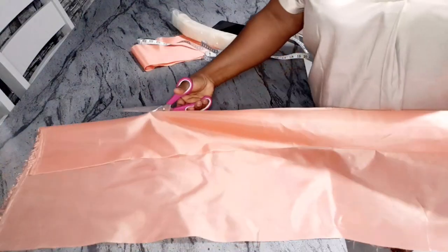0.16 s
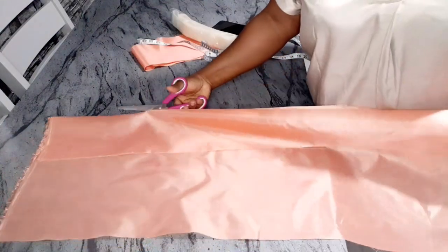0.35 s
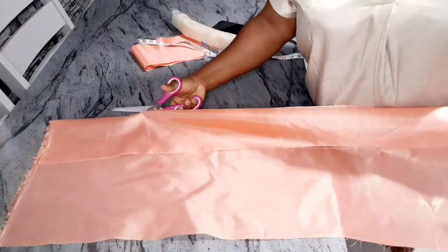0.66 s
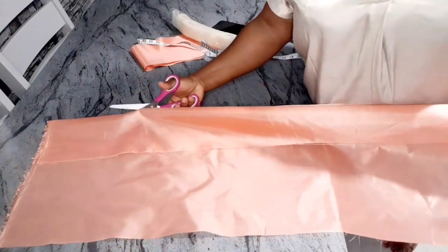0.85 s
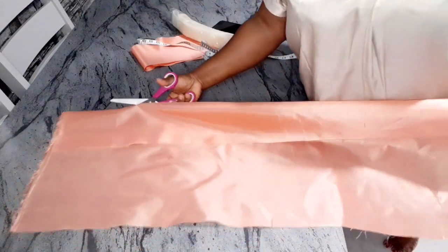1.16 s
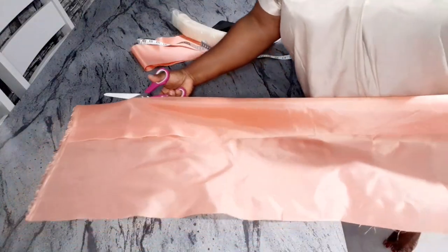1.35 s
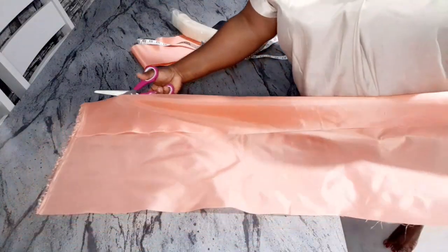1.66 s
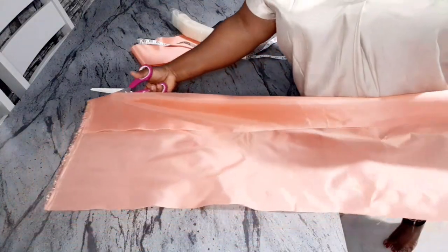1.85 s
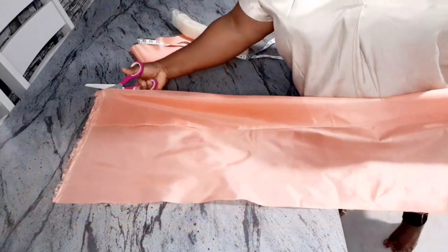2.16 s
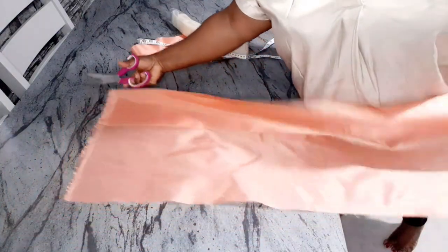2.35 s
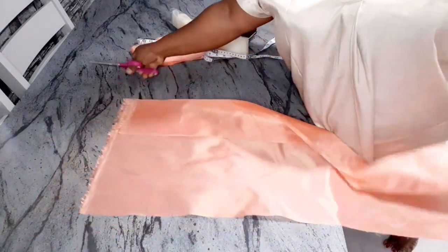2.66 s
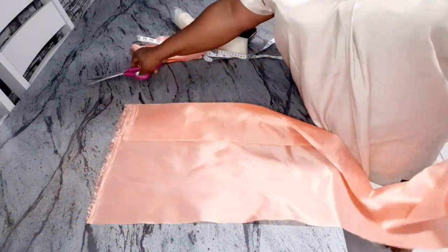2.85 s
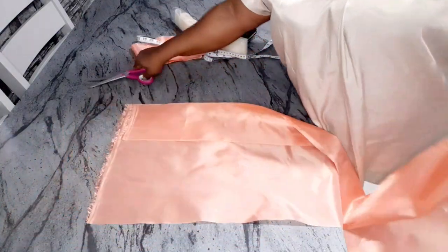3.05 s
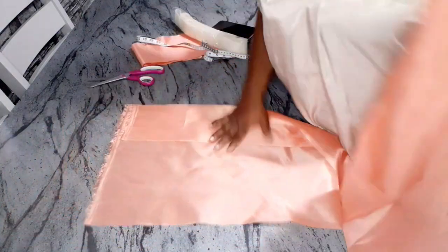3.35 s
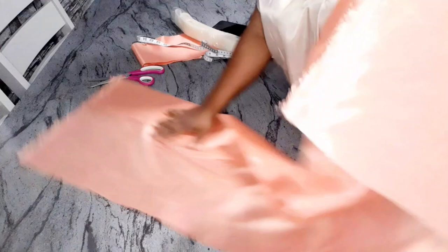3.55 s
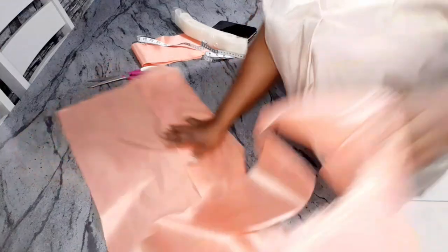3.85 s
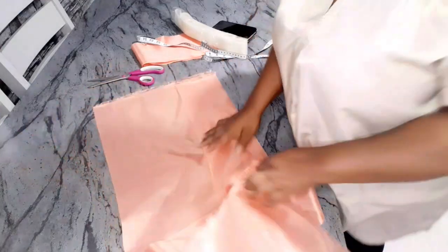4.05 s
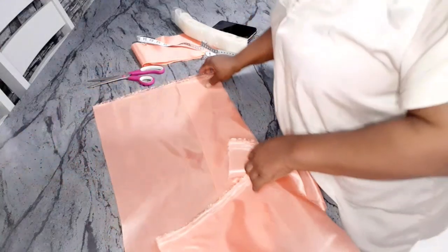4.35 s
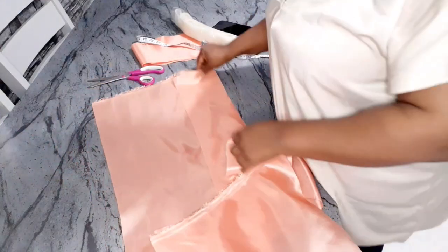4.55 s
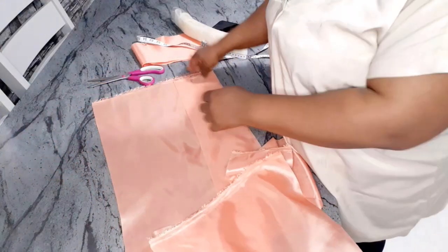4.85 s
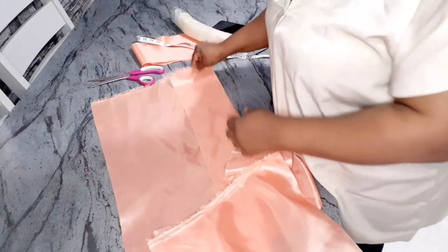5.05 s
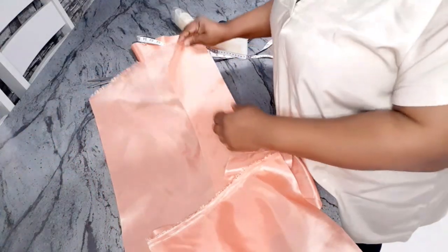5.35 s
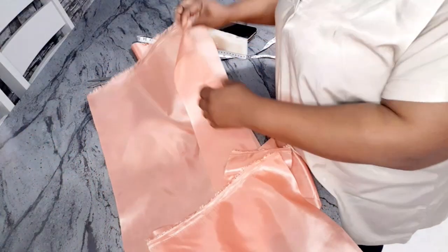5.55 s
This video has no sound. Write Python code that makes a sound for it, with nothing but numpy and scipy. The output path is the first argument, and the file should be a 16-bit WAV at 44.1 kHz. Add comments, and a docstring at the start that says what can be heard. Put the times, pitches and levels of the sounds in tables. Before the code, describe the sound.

Scissors snip and glide crisply through stiff satin on a table, knock down with a clatter, then the cloth is swept across with a hissing rustle.

```python
"""In a small hard room with a faint hum, scissors snip into stiff satin: threads snap, edges click.
They glide through the rest, lower blade droning on the table, snip once more, bump the table and drop.
The cloth is swept round, folded and patted down: hissing fibres, a buzzing weave and hollow thuds.
Cutting and cloth are shaped noise, blows are bursts that ring damped modes, and two closely spaced
microphones hear it all with the room's answer."""
import sys
import numpy as np
from scipy import signal
from scipy.fft import rfft, irfft, next_fast_len
from scipy.io import wavfile
from scipy.ndimage import map_coordinates

SR = 44100
rng = np.random.default_rng(int(sys.argv[2]) if len(sys.argv) > 2 else 0)


def waveform_to_disk(signal):
    """Save audio, clipped to [-1, 1], as 16-bit WAV at the path in sys.argv[1]."""
    frames = np.transpose(np.atleast_2d(signal))
    scaled = np.clip(frames, -1, 1) * 32767
    samples = np.round(scaled).astype(np.int16)
    wavfile.write(sys.argv[1], SR, samples)


N = 250929
TIME = np.arange(N) / SR

# All table levels are relative: later gains set how loud each layer is heard.
# the blades close on the cloth: [t/s, length/s, hardest at share of the stroke/0-1, first click level/dB,
# thread snapping level/dB, blade scraping level/dB, table rumble level/dB]
SNIP_STROKES = [(0.0, 0.071, 0.33, -16, -27, -27, -37), (0.2175, 0.011, 0.071, -24, -46.5, -46, -41),
                (0.2496, 0.096, 0.48, -23, -30, -35.5, -39), (0.383, 0.028, .15, -16, -33.5, -39.5, -42),
                (0.4386, 0.058, 0.43, -17, -28, -37, -37), (0.9053, .028, 0.41, -25.5, -38, -44, -44.5),
                (0.934, .085, 0.56, -16, -28.5, -37.5, -39), (2.34, 0.088, 0.046, -12, -28.5, -30, -38)]
# the half-open blades are pushed through the cloth: [t/s, length/s, first click level/dB,
# thread snapping level/dB, blade scraping level/dB, table rumble level/dB]
GLIDE_STROKES = [(1.143, .865, -23, -30.5, -36.5, -35), (2.0333, .278, -20, -30.5, -30, -37.5)]
# spectrum of the finest fibres: [f/Hz, level per Hz/dB]
FIZZ_SPECTRUM = [(6000, -38), (9300, -5), (12000, 0.5), (16000, -1)]


def amp(db):
    """Decibels to gain."""
    return 10 ** (np.asarray(db) / 20)


def unit(x):
    """Scale to rms 1."""
    return x / np.sqrt(np.mean(x ** 2) + 1e-20)


def along(points, hz):
    """Read (Hz, value) points along a log frequency axis."""
    f, v = np.transpose(points)
    return np.interp(np.log(hz + 1), np.log(f + 1), v)


def wobble(rate):
    """A smooth random curve, rate knots a second."""
    return map_coordinates(rng.standard_normal(int(N * rate / SR) + 4), [TIME * rate])


def filtered(x, response):
    """x times a response of frequency."""
    size = x.shape[-1]
    padded = next_fast_len(size + SR // 4, True)
    spectrum = rfft(x, padded) * response(np.fft.rfftfreq(padded, 1 / SR))
    return irfft(spectrum, padded)[..., :size]


def causal(gain, size=4096):
    """The minimum-phase impulse response with this gain over frequency."""
    cepstrum = irfft(np.log(np.maximum(gain(np.fft.rfftfreq(size, 1 / SR)), 1e-6)))
    fold = 1 + np.sign(size // 2 - np.arange(size))
    fold[0] = 1
    return irfft(np.exp(rfft(cepstrum * fold)))


def coloured(x, spectrum):
    """x given a spectrum, at rms 1."""
    return unit(filtered(x, lambda hz: amp(along(spectrum, hz))))


def grains(rate, spread_db):
    """Tiny snaps at random moments, rate a second, of uneven size."""
    happens = rng.random(N) < rate / SR
    sign = rng.choice([-1, 1], N)
    return happens * sign * amp(spread_db * np.clip(rng.standard_normal(N), -2, 2))


def burst(t, rise, length):
    """The chatter of a contact: its decay falls 20 dB per length, with energy 1."""
    x = rng.standard_normal(len(t)) * (1 - np.exp(-t / rise)) * amp(-20 * t / length)
    return x / np.linalg.norm(x)


def add(track, s, sound):
    """Mix a sound into a track at time s."""
    start = max(round(s * SR), 0)
    track[..., start:start + sound.shape[-1]] += sound[..., :N - start]


def progress(s, length):
    """How far a movement has come (0-1), and whether it is under way."""
    return np.clip((TIME - s) / length, 0, 1), (TIME >= s) & (TIME < s + length)


def spread(pair):
    """Two unrelated signals as sound from all sides: most alike at both microphones in the bass."""
    # diffuse sound: [f/Hz, left-right likeness/-1 to 1]
    likeness = [(100, 0.73), (300, 0.88), (650, .62), (1200, -0.28), (2000, -.05), (5000, -0.26),
                (15000, -0.15)]
    turn = lambda hz: np.arccos(np.clip(along(likeness, hz), -1, 1)) / 2
    mid, side = filtered(pair, lambda hz: np.array([np.cos(turn(hz)), np.sin(turn(hz))]))
    return np.array([mid + side, mid - side])


def diffuse(size):
    """Noise from all sides."""
    return spread(rng.standard_normal((2, size)))


def room(x, direct_db, lag=0.99):
    """The direct sound, lag samples later on the left, and a fresh decaying tail from the walls."""
    # how long the walls ring: [f/Hz, t60/s]
    reverb_times = [(120, 0.61), (400, 0.51), (1500, 0.55), (4000, 0.49), (8000, 0.41), (15000, 0.25)]
    hz, t, z = signal.stft(diffuse(SR * 2 // 3), SR, nperseg=256)
    decay = amp(-60 * t / along(reverb_times, hz)[:, None])
    tail = signal.istft(z * decay, SR, nperseg=256)[1]
    direct = np.sinc(np.arange(tail.shape[1]) - 8 - np.array([[lag], [0]]))
    answer = tail / np.linalg.norm(tail[0]) + amp(direct_db) * direct
    return signal.fftconvolve(x[None], answer / np.linalg.norm(answer[0]), axes=1)


def moving(x, direct_db, size=8192):
    """A moving source meets ever new reflections: each block of size samples gets a fresh tail."""
    out = np.zeros((2, N))
    for start in range(0, N, size):
        add(out, start / SR, room(x[start:start + size], direct_db))
    return out


def background():
    """Still room air as diffuse noise, and an appliance's unsteady hum whose high lines waver most."""
    # spectrum of the air: [f/Hz, level per Hz/dB]
    air_spectrum = [(20, -28), (35, -10), (55, -7), (97, -5), (145, -10), (309, -12), (439, -14),
                    (1100, -17.5), (1790, -27), (3000, -24), (7920, -27), (9070, -34), (14400, -25),
                    (16000, -34)]
    # lines of the hum: [f/Hz, level/dB]
    hum_lines = [(64.6, -65), (102.3, -70.5), (145.3, -64), (301.5, -72.5), (2665, -84), (3903, -84)]
    hum, drone = np.zeros(N), np.zeros(N)
    for hz, db in hum_lines:
        level = amp(db + 2.5 * wobble(9)) * np.sqrt(2)
        waver = (.4 + hz / 1800) * wobble(30)
        hum += level * np.sin(2 * np.pi * hz * TIME + waver)
    for hz, db in [(44.5, -60.5), (61, -59.0)]:
        drone += amp(db) * np.sin(2 * np.pi * hz * TIME + 0.34 * wobble(5))
    return amp(-55.5) * coloured(diffuse(N), air_spectrum) + amp(2.5) * hum + drone


def under_force(force_db, thread_db, scrape_db, rumble_db):
    """Gains of snapping, scrape and rumble: all follow the force, the threads most closely."""
    scrape_follows, rumble_follows = 0.53, 0.39  # dB per dB of force
    return amp([thread_db + force_db,
                scrape_db + scrape_follows * force_db,
                rumble_db + rumble_follows * force_db])


def snip(s, length, hardest, *levels_db):
    """One closing of the blades: the force swells towards its hardest moment and fades."""
    arch_db = 9  # the force is this much weaker half a stroke away from its hardest moment
    u, on = progress(s, length)
    return on * under_force(-arch_db * (2 * (u - hardest)) ** 2, *levels_db)


def glide(s, length, *levels_db):
    """One glide: the edge bites almost at once, then the force is the push of the arm."""
    # force on the gliding scissors: [t/s, force/dB]
    arm_push = [(1.15, 1.5), (1.35, -.5), (1.57, -11.5), (1.62, -5), (1.85, -5), (2.04, -7.5), (2.16, -3),
                (2.19, -9), (2.29, -3.5)]
    attack_s = 0.0032
    u, on = progress(s, length)
    attack = on * (1 - np.exp(-u * length / attack_s))
    return attack * under_force(np.interp(TIME, *np.transpose(arm_push)), *levels_db)


def cutting():
    """Quick thread snaps shake steel and table; a gliding blade makes the table drone."""
    # spectra of snapping threads, scraping steel, rumbling table: [f/Hz, level per Hz/dB]
    thread_spectrum = [(1100, -27), (1800, -24), (2300, -14.5), (3000, -6), (3900, -1.5), (5500, -4.5),
                       (7200, -5.5), (8200, -3), (9200, -11.5), (11600, -4), (14500, -6.5), (16000, -6)]
    scrape_spectrum = [(350, -49), (600, -3.5), (787, -2), (1110, -3), (1280, -3), (1660, -4.5),
                       (2380, -8.5), (2800, -10.5), (3640, -28), (6160, -120)]
    rumble_spectrum = [(30, -45), (60, -33), (130, -16.5), (205, 0.5), (250, -7), (400, -3), (510, -2),
                       (620, -17.5), (750, -14), (1000, -38)]
    # spectrum of the table top under the lower blade: [f/Hz, level per Hz/dB]
    drone_spectrum = [(30, -35), (48, 0.5), (65, 2.5), (90, -16), (122, 4.5), (170, -17), (260, -32)]
    closing = sum(snip(s, length, hardest, *levels) for s, length, hardest, _, *levels in SNIP_STROKES)
    gliding = sum(glide(s, length, *levels) for s, length, _, *levels in GLIDE_STROKES)
    thread, scrape, rumble = closing + gliding

    snaps = unit(grains(rate=4000, spread_db=3.5)) + .8 * rng.standard_normal(N)
    thick_snaps = unit(grains(rate=160, spread_db=3.5))  # thicker threads that snap singly
    uneven = amp(1.6 * wobble(90))  # the blades advance unevenly
    snaps = (snaps + amp(-13.5) * thick_snaps) * uneven
    sound = amp(-0.14) * thread * coloured(snaps, thread_spectrum)
    sound += amp(-1.5) * scrape * coloured(snaps, scrape_spectrum)
    sound += amp(-3) * rumble * coloured(snaps, rumble_spectrum)

    # harder cutting is brighter: the fizz outgrows the snapping
    fizz_db, fizz_at_db, fizz_power = -41.5, -28, 1.5  # fizz level at that snapping level
    fizz_level = amp(fizz_db) * (thread / amp(fizz_at_db)) ** fizz_power
    fizz = fizz_level * coloured(uneven * rng.standard_normal(N), FIZZ_SPECTRUM)
    drone = amp(-6) * gliding[1] * coloured(rng.standard_normal(N), drone_spectrum)  # follows the scrape
    return moving(sound + fizz, direct_db=2.5) + moving(drone, direct_db=11.0)


def clicks():
    """Short bright noise ticks as the edges catch each other; a blade rings on as a wavering sine."""
    # steel catches on steel, between and during strokes and as the scissors land: [t/s, level/dB]
    catches = [(0.039, -15), (0.0444, -23), (0.403, -26), (0.4474, -22.5), (0.912, -24), (0.9486, -14),
               (1.1472, -16), (2.222, -18), (2.3037, -14), (2.3518, -15), (2.363, -21.5), (2.593, -27),
               (2.9425, -14)]
    # a blade rings on after closing or striking: [t/s, f/Hz, level/dB, t60/s]
    ringing_blades = [(0.984, 3370, -33.5, 0.23), (2.341, 7900, -27, 0.11), (2.341, 14723, -44, .25),
                      (2.942, 3400, -33, 0.26), (2.943, 1560, -27.5, 0.26)]
    steel_spectrum = [(200, -16.5), (1500, -1), (4000, -1.5), (8000, -0.5), (15000, -2)]  # f/Hz, level/dB
    t, ticks, rings = np.arange(SR // 4) / SR, np.zeros(N), np.zeros(N)
    steel = causal(lambda hz: amp(along(steel_spectrum, hz)))
    # every stroke opens with a click
    bites = [(s, db) for s, _, _, db, *_ in SNIP_STROKES] + [(s, db) for s, _, db, *_ in GLIDE_STROKES]
    for s, db in [*bites, *catches]:
        tick = signal.fftconvolve(burst(t, rise=0.00015, length=0.00074), steel)
        add(ticks, s - .0003, amp(db + 11) * tick)
    for s, hz, db, t60 in ringing_blades:
        waver = 1.1 * wobble(200)[:len(t)]  # a slight random waver roughens and broadens the ring
        tone = np.sin(2 * np.pi * hz * t + waver) * (1 - np.exp(-t / 0.0018))
        add(rings, s, amp(db - 60 * t / t60) * tone)
    return moving(ticks, direct_db=-2) + moving(rings, direct_db=7)


def thump(t):
    """The whole table top flexes in its lowest modes, as decaying sines."""
    modes = [(83.4, -1.5, 0.087), (121.9, 1.5, 0.32), (225.3, -11.0, 0.19), (321, -8.5, 0.24)]  # f/Hz, level/dB, t60/s
    flex = sum(amp(db - 60 * t / t60) * np.sin(2 * np.pi * hz * t) for hz, db, t60 in modes)
    return flex * (1 - np.exp(-t / 0.0062))


def thuds():
    """Soft pushes make the table's frame sound hollow: bursts through broad resonances, and a thump."""
    # hands and blades press the cloth down on the table:
    # [t/s, level/dB, thump level/dB, dull above f/Hz, 20 dB decay/s]
    presses = [(0.321, -40.5, -12, 460, 0.018), (4.391, -47.5, 9.5, 302, 0.056),
               (4.871, -42.5, 9.5, 3600, 0.043), (4.897, -44, 0, 1305, 0.034)]
    # resonances of the table's frame: [f/Hz, width/Hz, level/dB]
    frame_modes = [(121.8, 44.7, -6), (204, 65, -4.5), (404, 95, -8), (563, 300, -16.5), (1370, 208, -10.5),
                   (1714, 160, -13), (2446, 210, -9.5), (2900, 340, -12), (3570, 140, -21),
                   (4150, 230, -14), (4780, 250, -16)]
    t, out = np.arange(SR // 4) / SR, np.zeros((2, N))

    def frame(hz):
        """Summed power of the resonances over a low floor, as a gain."""
        power = sum(amp(db) ** 2 / (1 + (2 * (hz - centre) / width) ** 2) ** 2
                    for centre, width, db in frame_modes)
        return np.sqrt(power + amp(-24.5) ** 2)

    for s, db, thump_db, dull_hz, length in presses:
        body = causal(lambda hz: frame(hz) / (1 + (hz / dull_hz) ** 2) ** 0.59)
        push = signal.fftconvolve(burst(t, .002, length), body / np.linalg.norm(body))
        add(out, s, amp(db + 37.0) * room(push, direct_db=-2))
        add(out, s, amp(db + thump_db) * thump(t))
    return out


def ring(modes, t):
    """Damped modes at slightly new strengths and random phases, with energy 1."""
    x = np.zeros(len(t))
    for hz, db, t60 in modes:
        level = amp(db + rng.normal(0, 1) - 60 * t / t60)
        x += level * np.sin(2 * np.pi * (hz * t + rng.random()))
    x = x * (1 - np.exp(-t / 0.0048))
    return x / np.linalg.norm(x)


def knocks():
    """Each blow of the scissors is a short clatter; it thumps the table and rings table and scissors."""
    # the scissors strike the table: [t/s, level/dB, thump level/dB, dull above f/Hz,
    # clatter 20 dB decay/s, share of the ring in the scissors/0-1]
    blows = [(2.591, -30.5, 3.5, 1900, 0.04, 0), (2.625, -31, -8, 1400, 0.034, 0.05),
             (2.66, -30.5, 0, 1300, 0.057, .02), (2.769, -33.5, -14, 8000, 0.02, 0.5),
             (2.777, -22.5, -7, 9000, 0.049, 1), (2.941, -28, -2.5, 5000, .028, 0.3),
             (3.111, -19.5, -7, 5110, 0.0042, .02), (3.115, -13, -16, 9000, 0.011, .05),
             (3.127, -15, -14.5, 3300, 0.02, .02), (3.152, -22.5, -12, 3030, 0.029, .02)]
    # spectrum of a blow: [f/Hz, level per Hz/dB]
    blow_spectrum = [(35, -34.5), (70, -24), (120, -8.5), (165, -12.5), (220, -6.5), (285, -11.5),
                     (380, -7), (680, -7), (1000, -8), (1220, -4), (1700, -4), (2100, -8.5), (2600, -10.5),
                     (3700, -8), (5200, -11), (8000, -13), (9400, -18.5), (12500, -13.5), (16000, -20)]
    # modes of the table top, and of scissors lying against it: [f/Hz, level/dB, t60/s]
    table_modes = [(373, -1, .3), (412, -1, .33), (510, -6, .36), (781, -1, .38), (818, -6, .3),
                   (895, -7, .3), (966, -6, .32), (1190, 0, .38), (1241, 1, .4), (1385, -6, .4),
                   (1636, -5, .38), (1770, -5, .35), (2387, -6, .4), (2519, -8, .35), (3100, -6, .32),
                   (3669, -10, .35), (4075, -12, .3)]
    scissors_modes = [(586, 2, 0.27), (763, -12, 0.19), (1490, -11, 0.29), (1680, -12, 0.23),
                      (1760, -4.5, 0.52), (1866, -7.5, 1), (2630, -16.5, 0.37), (3260, -8.5, 0.27),
                      (3440, -13.5, 0.3), (3540, -14, .25), (6040, -20.5, 0.31), (5900, -12.5, .2)]
    rise_share = .045  # the rise time of a blow, as a share of its clatter
    t, out = np.arange(SR // 2) / SR, np.zeros((2, N))
    norm = np.linalg.norm(causal(lambda hz: amp(along(blow_spectrum, hz))))
    for s, db, thump_db, dull_hz, clatter, share in blows:
        soft = lambda hz: 1 / np.sqrt(1 + (hz / dull_hz) ** 2)  # a padded blow has little top
        body = causal(lambda hz: amp(along(blow_spectrum, hz)) * soft(hz)) / norm
        hit = signal.fftconvolve(burst(t, rise_share * clatter, clatter), body)[:len(t)]
        add(out, s, amp(db + 36.5) * room(hit, direct_db=-5.5))
        table, steel = amp(30) * np.sqrt(np.clip([1 - share, share], 0, 1))
        rings = np.array([table * ring(table_modes, t) + steel * ring(scissors_modes, t) for _ in range(2)])
        add(out, s, amp(db) * spread(rings) + amp(db + thump_db) * thump(t))
    return out


def cloth():
    """Satin slides over the table: a fine hiss, and a weave whose buzz rises with the sliding speed."""
    # the cloth is pulled over the table: [t/s, length/s, rustle level/dB, rubbing weave level/dB, fizz level/dB]
    pulls = [(3.401, .335, -34.5, -30, -46), (3.715, .345, -38.5, -39, -59.5), (3.95, 0.56, -55, -66, -75),
             (4.152, 0.041, -54, -70, -44), (4.397, .095, -47.5, -58, -58),
             (5.279, 0.073, -63, -60.5, -74.5), (5.51, 0.081, -57.5, -69, -57)]
    # spectrum of the rustle: [f/Hz, level per Hz/dB]
    rustle_spectrum = [(80, -19), (150, -8.5), (240, -17.5), (400, -13.5), (600, -13.5), (900, -11),
                       (1500, -8.5), (2500, -7.5), (4000, -9.5), (8000, -12), (9400, -16), (12000, -12),
                       (16000, -17)]
    skew = 0.73  # under 1: the hand speeds up faster than it slows down
    rustle_power, rub_power = 0.93, 1.46  # amplitude goes with sliding speed to this power
    slow_hz, fast_hz = 1099, 1490  # the weave sings higher as it slides faster
    power, fastest = np.zeros((3, N)), np.zeros(N)
    for s, length, *levels_db in pulls:
        u, on = progress(s, length)
        speed = on * np.abs(np.sin(np.pi * u ** skew))
        growth = np.array([speed ** rustle_power, speed ** rub_power, speed ** rustle_power])
        power += (amp(levels_db)[:, None] * growth) ** 2
        fastest = np.maximum(fastest, speed)
    rustle, rub, fizz = np.sqrt(power)

    fibres = unit(grains(rate=5000, spread_db=3)) + rng.standard_normal(N)
    hiss = amp(4.0) * rustle * coloured(fibres * amp(0.8 * wobble(32)), rustle_spectrum)
    hiss += fizz * coloured(rng.standard_normal(N), FIZZ_SPECTRUM)
    phase = 2 * np.pi * np.cumsum(slow_hz + (fast_hz - slow_hz) * fastest) / SR
    # low noise makes the tone of the weave rough
    slips = unit(filtered(rng.standard_normal(N), lambda hz: 1 / (1 + (hz / 330) ** 4)))
    return moving(hiss + rub * slips * np.cos(phase), direct_db=-2.5, size=4096)


def scene():
    """All layers together, a little louder on the left."""
    layers = background() + cutting() + clicks() + thuds() + knocks() + cloth()
    return layers * amp([[.45], [-.45]])


def record(dry):
    """The recorder rounds off peaks towards full scale and keeps nothing above its band limit."""
    band_limit_hz = 16000
    limited = dry / (1 + np.abs(dry) ** 6) ** (1 / 6)
    return filtered(limited, lambda hz: hz < band_limit_hz)


dry = scene()
out = record(dry)
waveform_to_disk(out)
```